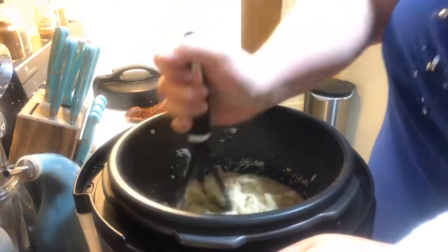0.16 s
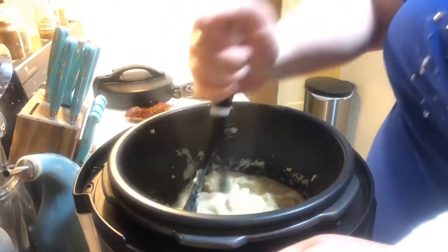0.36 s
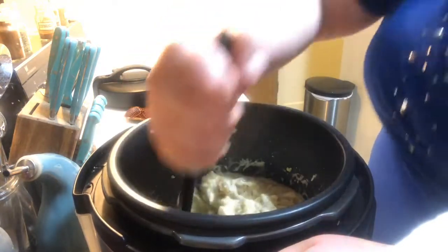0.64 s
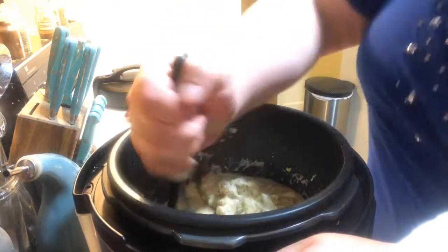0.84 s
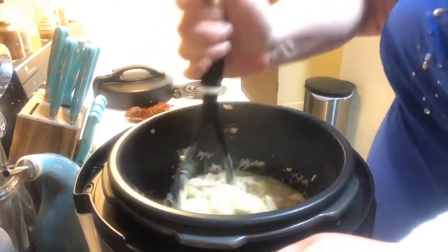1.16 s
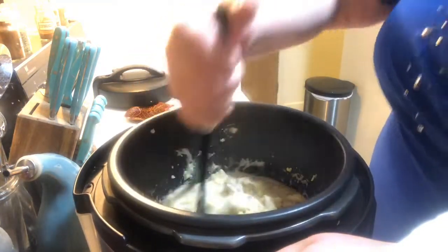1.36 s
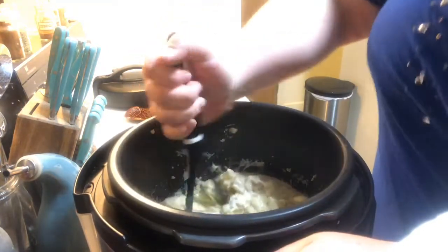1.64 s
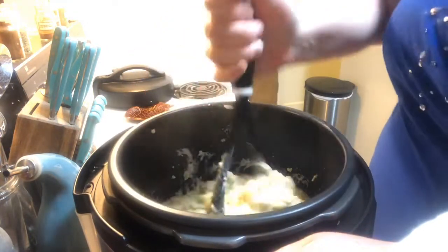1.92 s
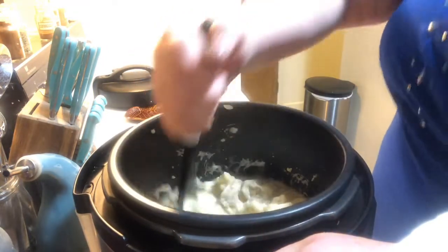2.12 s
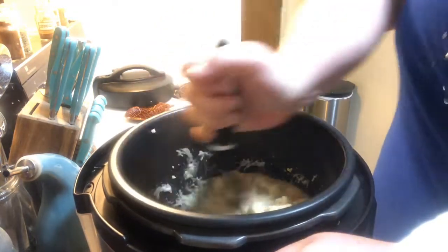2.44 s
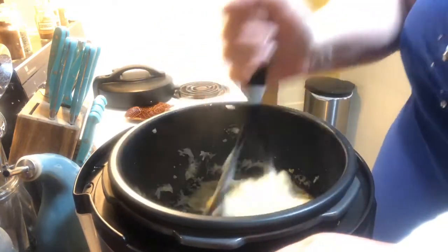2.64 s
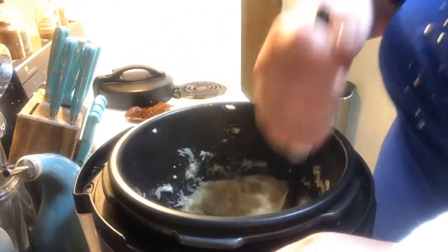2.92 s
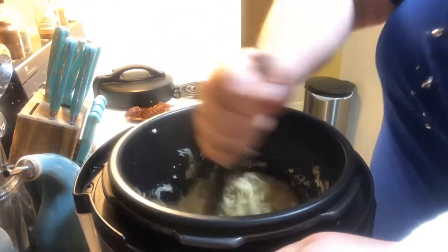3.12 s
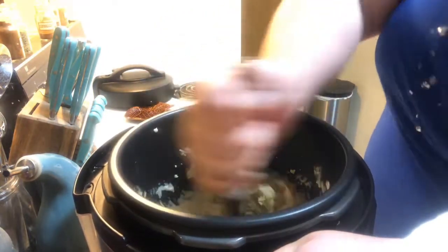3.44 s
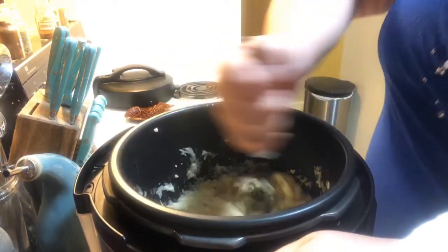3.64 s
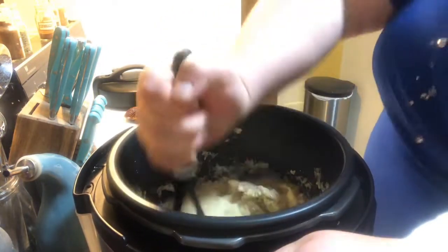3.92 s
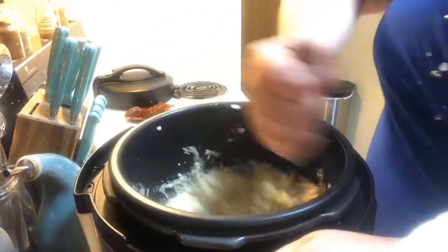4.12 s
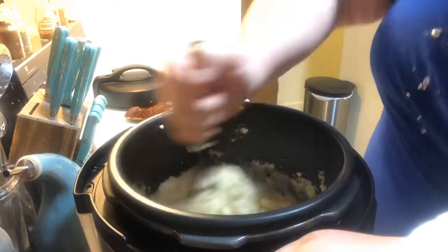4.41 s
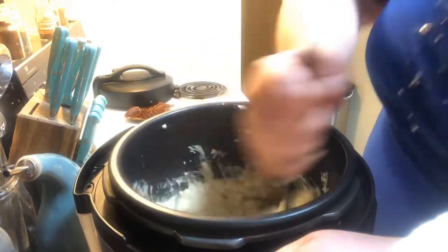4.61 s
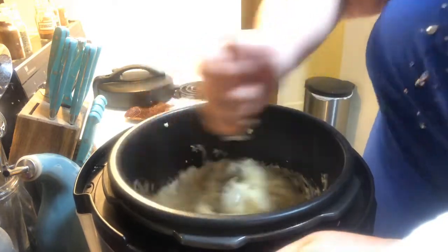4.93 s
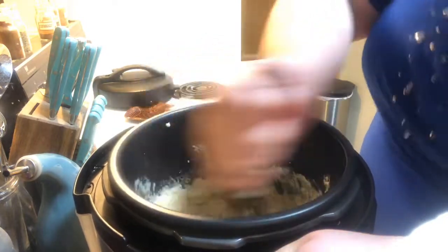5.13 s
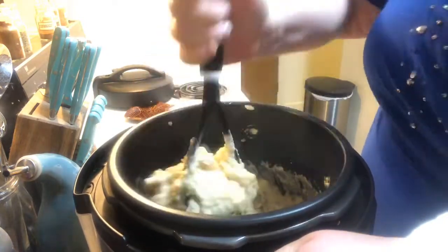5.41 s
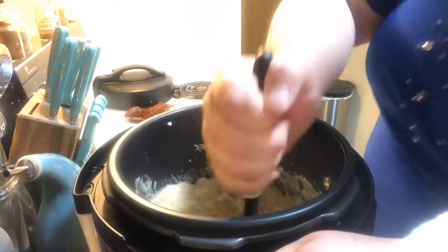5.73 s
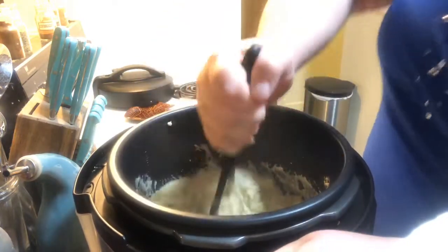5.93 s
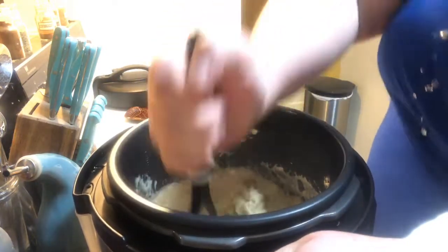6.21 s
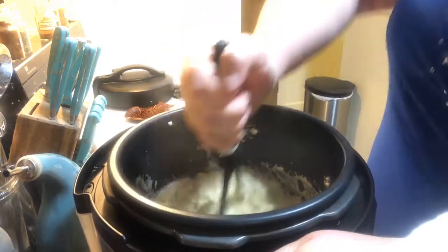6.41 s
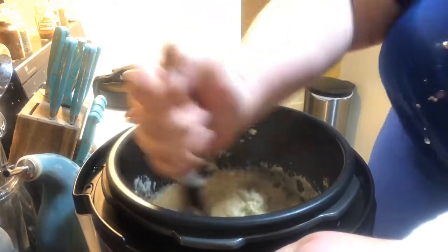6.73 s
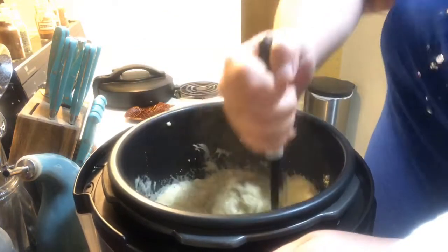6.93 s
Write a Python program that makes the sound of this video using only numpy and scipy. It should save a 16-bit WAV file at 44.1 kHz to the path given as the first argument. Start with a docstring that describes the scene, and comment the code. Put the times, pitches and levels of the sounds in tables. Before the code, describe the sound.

Close up, a masher works wet, sticky cooked potatoes inside a deep pot in a small, quiet kitchen with a faint low hum. Fine crackling starts at once; a clear knock and wet press land near 0.2 s, followed by peeling crackles and snaps around 0.5 s. At 1.0 s a squelch bursts with a short glug and a fine spray. More snaps follow near 1.4 s, then the hardest knock rings the pot sharply at 1.7 s, with a bright snap just after. From 2 to 3 s, sticky pops and snaps scatter between presses. Stirring grows briskest near 3.7 s and stays dense to about 4.9 s, full of slaps, falling glugs and light hollow knocks. After a brief lull, a strong knock hits at 5.2 s. Sparser squelches, snaps and glugs continue through 5.8, 6.1 and 6.5 s, ending with a wet pop near 6.9 s.

```python
"""A masher works wet cooked potatoes in a deep non-stick pot, close up in a small kitchen with a quiet hum.
From the start the mash crackles as it tears (random ticks and pops); films snap and knocks ring the pot (pings).
From 0.2 s the masher presses, and at times peels stickily away; air spits and glugs (sines falling in pitch).
Fine sprays (shaped ticks) hiss from 0.5 s; the hardest knock falls at 1.7 s, the briskest stirring near 3.7 s."""
import sys
import numpy as np
from scipy import signal
from scipy.fft import rfft, irfft
from scipy.io import wavfile
from scipy.ndimage import uniform_filter1d

SR = 44100
rng = np.random.default_rng(int(sys.argv[2]) if len(sys.argv) > 2 else 0)


def digitize_waveform(pressure):
    """Quantize a signal to 16-bit integers and store it at the path in sys.argv[1].

    Rows of a 2-D input are taken as channels; values are limited to [-1, 1].
    """
    field = np.atleast_2d(pressure).T
    bounded = np.clip(field, -1, 1)
    quanta = np.round(bounded * 32767).astype(np.int16)
    wavfile.write(sys.argv[1], SR, quanta)


N = 311346

# spectrum of tearing films of mash: hz, relative_db
CRACKLE_EQ = [(300, -16), (1000, -13), (1900, -5.5), (2700, -5.5), (3500, -1), (4500, 0), (5300, -8),
              (6300, -17.5), (7600, -14), (9500, -34), (15000, -36.5)]
# spectrum of squeezed, slopping mash: hz, relative_db
CHURN_EQ = [(60, -6), (150, -2), (300, -0.5), (480, 1), (640, -4.5), (800, -7.5), (1100, -6), (1500, -7),
            (2100, -9.5), (3500, -8.5), (8000, -60.5)]


def undb(db):
    """Decibels to gain."""
    return 10 ** (np.asarray(db) / 20)


def unit(x):
    """Scale to rms 1."""
    return x / np.sqrt(np.mean(x ** 2) + 1e-18)


def seconds(length_s):
    """Time axis in seconds."""
    return np.arange(int(length_s * SR)) / SR


def add(out, start_s, x):
    """Mix x into out from start_s."""
    i = max(int(start_s * SR), 0)
    out[i:i + len(x)] += x[:max(N - i, 0)]


def colour(x, points, size=2048):
    """Minimum-phase filter of unit energy, shaped by (hz, db) points."""
    hz, db = np.transpose(points)
    grid_hz = np.maximum(np.fft.rfftfreq(size, 1 / SR), 1)
    log_gain = np.log(undb(np.interp(np.log(grid_hz), np.log(hz), db)))
    # fold the cepstrum to make the response causal
    cepstrum = irfft(log_gain)
    cepstrum[1:size // 2] *= 2
    cepstrum[size // 2 + 1:] = 0
    response = irfft(np.exp(rfft(cepstrum)))
    return signal.fftconvolve(x, response / np.linalg.norm(response))[:len(x)]


def ticks(count, rate_hz, spread_db):
    """Tiny ruptures at random moments; a wider spread makes many faint and a few strong; rms 1."""
    size = undb(spread_db * np.minimum(rng.exponential(size=count), 4))
    hits = rng.random(count) < rate_hz / SR
    return unit(hits * size * rng.choice([-1, 1], count))


def pocket(t, first_hz, last_hz, glide_s, decay_s, rise_s):
    """A ringing pocket whose pitch slides from first_hz to last_hz; envelope peak 1."""
    hz = last_hz + (first_hz - last_hz) * np.exp(-t / glide_s)
    swell = (1 - np.exp(-t / rise_s)) ** 2 * np.exp(-t / decay_s)
    return swell / swell.max() * np.sin(2 * np.pi * np.cumsum(hz) / SR)


def room_hum():
    """Soft room noise, with a faint narrow-band drone near the lowest air mode of the pot."""
    # hum spectrum: hz, relative_db
    hum_eq = [(25, -48.5), (50, 8.5), (90, 4.5), (180, 8.5), (300, -9), (600, -4.5), (1100, -15),
              (2500, -49), (4400, -45), (6500, -21), (10000, -24), (15500, -26)]
    hum_db, drone_hz, drone_db = -64.5, 188, -66.5
    drone_eq = [(60, -35), (130, -16), (drone_hz, 0), (240, -18), (600, -50)]
    drone = colour(rng.standard_normal(N), drone_eq, size=8192)
    hum = colour(rng.standard_normal(N), hum_eq, size=8192)
    return undb(hum_db) * hum + undb(drone_db) * drone


def strokes(rows, attack_s, release_s):
    """Gain of a series of strokes: each swells, holds for its length and dies away; powers add."""
    t = np.arange(N) / SR
    power = np.zeros(N)
    for start_s, length_s, level_db in rows:
        before = (start_s - t) / attack_s
        after = (t - start_s - length_s) / release_s
        power += undb(2 * level_db) * np.exp(-2 * np.clip(np.maximum(before, after), 0, 20))
    return np.sqrt(power)


def effort():
    """Gains of crackle and churn: peeling crackles, pressing mostly churns, stirring does both."""
    # masher presses down and squeezes the mash: start_s, length_s, level_db
    press_rows = [(.2, 0.057, -46.5), (.67, .06, -63), (.98, 0.057, -49), (1.43, 0.029, -51),
                  (1.76, 0.017, -38), (2.05, 0.054, -57.5), (2.155, 0.019, -44), (2.485, 0.033, -56),
                  (2.805, 0.052, -48), (3.27, 0.057, -49.5), (3.46, 0.087, -54), (3.63, .06, -50.5),
                  (3.73, 0.055, -42), (3.85, 0.07, -42.5), (4.13, 0.035, -41), (4.23, .11, -42),
                  (4.44, 0.11, -50), (4.58, 0.068, -43.5), (4.7, 0.12, -47), (4.87, 0.052, -48),
                  (5.22, 0.1, -49), (5.44, 0.1, -57.5), (5.57, 0.047, -48.5), (5.81, 0.044, -49.5),
                  (6.12, 0.044, -48), (6.32, 0.0067, -46.5), (6.53, .08, -46.5), (6.65, 0.022, -45),
                  (6.875, 0.013, -44.5)]
    # masher lifts and the sticky mash peels off: start_s, length_s, level_db
    peel_rows = [(.23, 0.073, -50.5), (.47, .1, -54), (.64, 0.093, -57), (1.06, 0.046, -53),
                 (1.32, 0.13, -55), (1.9, 0.037, -54.5), (2.07, 0.14, -57), (2.49, 0.12, -55),
                 (2.69, .06, -53.5), (2.88, 0.11, -50), (3.12, 0.067, -50.5), (3.36, 0.061, -52),
                 (3.99, 0.042, -66), (4.37, .12, -51), (4.93, 0.067, -57.5), (5.42, .08, -53.5),
                 (5.87, 0.046, -57.5), (6.36, 0.094, -53), (6.58, 0.055, -49.5), (6.84, 0.16, -57.5)]
    # briskness of movement between strokes: time_s, level_db
    stir_points = [(0, -63.5), (.13, -70), (.6, -62), (1.6, -63), (2.4, -62.5), (3.1, -57.5), (3.7, -50.5),
                   (4.85, -56.5), (5.08, -69), (5.35, -62), (6.0, -62), (6.5, -60.5), (7.06, -61.5)]
    press_crackle_db, stir_crackle_db = -9, -2  # relative to the gain of each one's churn
    stir = undb(np.interp(np.arange(N) / SR, *np.transpose(stir_points)))
    press = strokes(press_rows, attack_s=.012, release_s=0.022)
    peel = strokes(peel_rows, attack_s=0.0071, release_s=0.019)
    crackle_parts = [peel, undb(press_crackle_db) * press, undb(stir_crackle_db) * stir]
    return np.linalg.norm(crackle_parts, axis=0), np.hypot(press, stir)


def pops(count, lo_hz, hi_hz, cycles, spread_db):
    """A stream of tiny wet pops, each a few cycles at its own rising pitch: many faint, a few strong; rms 1."""
    out, t = np.zeros(N), seconds(.006)
    pitches_hz = lo_hz * (hi_hz / lo_hz) ** np.linspace(0, 1, 20)
    shapes = []
    for hz in pitches_hz:
        shape = pocket(t, hz, hz * 1.272, glide_s=cycles / hz, decay_s=cycles / hz, rise_s=.5 / hz)
        shapes.append(np.sqrt(hz) * shape)
    for when, which, strength in rng.random((count, 3)):
        gain = undb(-spread_db * np.log(max(strength, 1 / 30)))
        add(out, when * N / SR, shapes[int(which * len(shapes))] * gain)
    return unit(out)


def tearing(crackle_gain, churn_gain):
    """Sticky mash pulls apart in a fine fizz and little pops, with duller slaps where it is squeezed."""
    fizz = undb(-8.0) * ticks(N, rate_hz=9000, spread_db=9.0)
    crackle = undb(-7.5) * pops(count=2600, lo_hz=2900, hi_hz=12000, cycles=2.6, spread_db=7.0)
    slaps = undb(-14.5) * pops(count=1200, lo_hz=679, hi_hz=2500, cycles=1.58, spread_db=5.0)
    churn = undb(-9) * ticks(N, rate_hz=2300, spread_db=2.0)
    torn = colour(crackle_gain * (fizz + crackle), CRACKLE_EQ)
    squeezed = colour(churn_gain * (slaps + churn), CHURN_EQ)
    return torn + squeezed


def rustle(crackle_gain, churn_gain, smear_db=-9, scrape_db=-14):
    """The masher drags through the soft paste: a dense, smooth rustle under the crackle."""
    # rustle spectrum: hz, relative_db
    rustle_eq = [(500, -9.5), (1100, -9.5), (1900, -3.5), (3200, -4.5), (4500, 3), (5600, -5),
                 (7600, -11.5), (10000, -26), (15000, -31)]
    drag_gain = np.hypot(crackle_gain, undb(scrape_db) * churn_gain)
    smear = colour(drag_gain * ticks(N, rate_hz=22000, spread_db=0.0), rustle_eq)
    return undb(smear_db) * smear


def stray_snaps(crackle_gain, count):
    """Fainter snaps at random moments, following the tearing around them up to a ceiling."""
    above_tearing_db, spread_db, ceiling_db = 13, 0.5, -54  # the ceiling limits the tearing level
    centre_hz, spread_octaves, splutter_db = 4540, 0.22, -7
    rows = []
    for when, strength, pitch in rng.random((count, 3)):
        tearing_db = min(20 * np.log10(crackle_gain[int(when * N)]), ceiling_db)
        level_db = tearing_db + above_tearing_db + spread_db * (2 * strength - 1)
        pitch_hz = centre_hz * 2 ** (spread_octaves * (2 * pitch - 1))
        rows.append((when * N / SR, level_db, pitch_hz, splutter_db))
    return rows


def pings(rows, ring_s):
    """A bright falling ping of a few cycles, a hollow body that outlasts it, and a splutter of torn film."""
    notes, splutter, t = np.zeros(N), np.zeros(N), seconds(.04)
    burst = (1 - np.exp(-t / 0.0017)) * np.exp(-t / 0.0029)
    body = pocket(t, 2030, 920, glide_s=0.00093, decay_s=0.0025, rise_s=0.00004)
    for start_s, level_db, hz, body_db, splutter_db in rows:
        ping = pocket(t, hz * 1.072, hz * 0.962, glide_s=0.00069, decay_s=ring_s, rise_s=0.00011)
        overtone = pocket(t, hz * 2.0, hz * 1.71, glide_s=0.00064, decay_s=0.00034, rise_s=0.00026)
        note = ping + undb(-23.5) * overtone + undb(body_db - 14.0) * body
        add(notes, start_s, undb(level_db - 1.0) * note)
        torn = burst * ticks(len(t), rate_hz=15000, spread_db=2.5)
        add(splutter, start_s, undb(level_db + splutter_db + 5.5) * torn)
    return notes + colour(splutter, CRACKLE_EQ)


def knocks_and_snaps(crackle_gain, snap_body_db=-19):
    """Knocks share one pitch and mostly sound hollow; snaps have their own pitch and little body."""
    # bursts of thin films of mash: start_s, level_db, pitch_hz, splutter_db
    snap_rows = [(.0192, -40, 3000, -15), (.294, -38, 5170, -19), (.3576, -36.5, 4250, -11),
                 (.4993, -35.5, 4020, -11), (.5278, -30, 4840, -13), (.5514, -31.5, 3640, -6.5),
                 (.6714, -37, 1610, -17), (.7177, -28.5, 1870, -14), (.7995, -38, 3270, -8.5),
                 (1.0792, -30, 5050, -11.5), (1.255, -44, 3730, -3.5), (1.3677, -27.5, 4320, -9),
                 (1.392, -33, 4550, -19), (1.4127, -40.5, 4470, 2.5), (1.49, -38, 4700, -2.5),
                 (1.4379, -41, 4700, 4.5), (1.7647, -33, 1980, -12), (1.7816, -21, 4860, -22),
                 (1.9962, -40, 4760, -4), (2.0075, -33.5, 4400, -0.5), (2.155, -27.5, 4540, -7),
                 (2.1984, -24.5, 4100, -15), (2.2467, -37.5, 2900, -4), (2.3283, -50.5, 4240, 3.5),
                 (2.4863, -33, 4530, -10), (2.5395, -27.5, 4930, -35), (2.7382, -36.5, 3800, -7),
                 (2.8911, -35, 3100, 0), (2.9433, -35, 3900, -5), (2.9709, -28, 3270, -14),
                 (3.0116, -29.5, 4680, -13), (3.1093, -27, 4570, -13.5), (3.2708, -36.5, 3540, 1),
                 (3.7321, -24.5, 4780, -5.5), (4.0127, -30, 1900, -10), (4.0666, -30.5, 1880, -8),
                 (4.4642, -29, 1980, -5.5), (5.002, -35.5, 4550, -18), (5.156, -38, 4030, -14.5),
                 (5.663, -37, 4700, -10), (5.682, -33, 4330, -13), (5.8266, -21.5, 2140, -17),
                 (5.8606, -38, 4340, 1.5), (6.0617, -42.5, 3040, -1), (6.1168, -25, 1700, -5),
                 (6.341, -31.5, 3440, -8), (6.3911, -31, 4260, -14), (6.5759, -23, 4170, 0),
                 (6.6606, -27, 1650, -6), (6.8845, -25.5, 4430, -12)]
    # masher knocks on the pot through the mash: start_s, level_db, body_db, splutter_db
    knock_rows = [(0.1862, -14.5, 4, -14.5), (0.898, -40, 4, -1.5), (0.9882, -21.5, -16, -5.5),
                  (1.696, -3.5, -0.5, -17.5), (2.81, -38, 14, 3), (3.3447, -27.5, 11.5, -4.5),
                  (3.7417, -27.5, -10, -7), (3.8779, -24, 3.5, -29), (4.2324, -30, 12.5, -22),
                  (4.3006, -24, 2.5, -13), (4.346, -28.5, 3, -15), (4.7637, -29, 12.5, -6),
                  (5.1989, -8.5, 1, -14), (5.2511, -28.5, 13, -6.5), (5.5693, -22, 5, -6.5),
                  (6.531, -21, 10, 2.5)]
    knock_hz = 3970
    knocks = [(start_s, level_db, knock_hz, body_db, splutter_db)
              for start_s, level_db, body_db, splutter_db in knock_rows]
    films = [(start_s, level_db, hz, snap_body_db, splutter_db)
             for start_s, level_db, hz, splutter_db in list(snap_rows) + stray_snaps(crackle_gain, count=60)]
    return pings(knocks, ring_s=0.00057) + pings(films, ring_s=0.001)


def glugs():
    """Air spits through a narrowing film of mash; the pocket opens, its note drops and the mash slops back."""
    # air pockets opening: start_s, level_db, first_hz, decay_s, spit_db
    glug_rows = [(0.201, -34.5, 344, 0.006, -56), (0.377, -42.5, 274, 0.017, -53.5),
                 (0.403, -40.5, 132, .018, -81), (0.673, -36, 840, 0.0025, -49),
                 (.994, -30.5, 952, 0.019, -52), (1.0025, -15, 1080, 0.00093, -47),
                 (1.004, -27.5, 580, .005, -54), (1.132, -44, 248, 0.0081, -54),
                 (1.158, -45.5, 117.6, 0.035, -66), (1.705, -33, 270, 0.0089, -68),
                 (1.768, -31, 1085, 0.009, -64), (1.781, -28.5, 687, 0.012, -37),
                 (1.877, -37.5, 1123, .006, -52.5), (2.161, -38.5, 563, 0.019, -47),
                 (2.198, -28.5, 1010, 0.0035, -41), (2.246, -34, 970, 0.0027, -70),
                 (2.758, -36, 750, 0.0032, -61), (2.818, -33.5, 490, 0.0078, -45),
                 (3.31, -38, 753, 0.027, -66), (3.344, -31, 728, 0.012, -78), (3.37, -46, 160, 0.018, -68),
                 (3.513, -35.5, 512, 0.02, -44), (3.628, -39, 401, 0.02, -39.5),
                 (3.743, -43, 604, 0.034, -38), (3.766, -36, 688, 0.011, -50),
                 (3.914, -34.5, 417, 0.02, -46.5), (4.027, -38.5, 302, 0.014, -40),
                 (4.145, -27.5, 678, 0.011, -47), (4.166, -38, 500, 0.013, -47),
                 (4.235, -47, 757, 0.015, -52), (4.309, -33, 250, 0.004, -55),
                 (4.326, -35, 967, 0.011, -62), (4.484, -38, 292, .012, -42),
                 (4.604, -34.5, 607, 0.0099, -46), (4.633, -46, 573, 0.014, -46.5),
                 (4.71, -43, 446, 0.018, -48), (4.792, -41, 701, 0.017, -46),
                 (4.812, -30.5, 350, 0.0066, -63), (4.889, -34.5, 276, 0.0084, -38.5),
                 (5.201, -24, 429, 0.0115, -45), (5.4, -45, 240, .017, -76),
                 (5.571, -40.5, 513, 0.024, -44), (6.071, -39, 280, 0.009, -52),
                 (6.175, -35, 350, 0.017, -50), (6.535, -28, 352, 0.019, -41),
                 (6.665, -25.5, 222, .011, -66), (6.898, -22.5, 378, 0.002, -46)]
    fall_share, open_s = .5, .01  # share of pitch lost when fully open; time scale of opening
    flutter_depth = .5
    lead_s, early_s, spit_s = .04, .008, .010
    notes, swell, collapse, t = np.zeros(N), np.zeros(N), np.zeros(N), seconds(.15)
    for start_s, level_db, first_hz, decay_s, spit_db in glug_rows:
        # longer glugs open wider and fall further
        openness = 1 - np.exp(-(decay_s / open_s) ** 2)
        last_hz = first_hz * (1 - fall_share * openness)
        note = pocket(t, first_hz, last_hz, glide_s=0.788 * decay_s, decay_s=decay_s, rise_s=0.00033)
        # the soft walls flap
        flutter = unit(uniform_filter1d(rng.standard_normal(len(t)), size=90))
        add(notes, start_s, undb(level_db - 7.5) * note * (1 + flutter_depth * flutter))
        slop_shape = (1 - np.exp(-t / 0.0002)) * np.exp(-t / (0.72 * decay_s))
        add(collapse, start_s, undb(level_db - 15.5) * slop_shape)
        # the spit peaks early_s before the pocket opens
        spit_shape = np.exp(-np.abs(t - lead_s) / spit_s)
        add(swell, start_s - lead_s - early_s, undb(spit_db) * spit_shape)
    spit = colour(swell * ticks(N, rate_hz=5000, spread_db=0), CRACKLE_EQ)
    slop = colour(collapse * ticks(N, rate_hz=5000, spread_db=2.0), CHURN_EQ)
    return notes + undb(-1) * spit + slop


def sprays(decay_s=0.0077):
    """Droplets flung from wet bursts: a brief, high hiss."""
    # fine sprays of droplets: start_s, level_db
    spray_rows = [(.528, -47), (0.985, -40), (1.439, -54), (1.995, -48.5), (2.328, -52), (2.968, -50),
                  (3.529, -43), (3.731, -43), (6.893, -47)]
    # spray spectrum: hz, relative_db
    spray_eq = [(2000, -32), (5000, 11), (7600, 2), (10000, -3), (15000, -15)]
    t, swell = seconds(.05), np.zeros(N)
    for start_s, level_db in spray_rows:
        add(swell, start_s, undb(level_db) * np.exp(-t / decay_s))
    return colour(swell * ticks(N, rate_hz=19000, spread_db=17.0), spray_eq)


def pot_and_kitchen(x):
    """The pot rings in its modes, its wall throws quick echoes, and the kitchen adds a short tail."""
    # air in the pot and its wall: mode_hz, resonance_over_direct_db, t60_s
    pot_modes = [(181, 10.5, 0.049), (285.4, 8, 0.086), (453, 5, 0.085), (591, 4, 0.018), (1019, 0, 0.049),
                 (1125, 2, 0.07), (1270, -30.5, 0.22), (1920, -6, 0.027)]
    # spectrum of the reflections: hz, relative_db
    reflection_eq = [(100, -19.5), (400, 5.5), (1100, 0), (2500, -1), (4200, -3.5), (8000, 0), (15000, 1.5)]
    t = seconds(.6)
    response = np.zeros(len(t))
    response[0] = 1  # direct sound
    for hz, level_db, t60_s in pot_modes:
        damping = np.log(1000) / t60_s
        ring = np.exp(-damping * t) * np.cos(2 * np.pi * hz * t)
        response += undb(level_db) * 2 * damping / SR * ring
    # pot wall, then kitchen
    for delay_s, t60_s, level_db in [(.0015, .04, -9), (.005, .36, -12)]:
        noise = colour(rng.standard_normal(len(t)), reflection_eq)
        echoes = noise * (t > delay_s) * np.exp(-np.log(1000) * t / t60_s)
        response += undb(level_db) * echoes / np.linalg.norm(echoes)
    return signal.fftconvolve(x, response)[:N]


def scene():
    """All the mash sounds come from inside the pot; the hum is added outside it."""
    crackle_gain, churn_gain = effort()
    mash = knocks_and_snaps(crackle_gain) + sprays() + glugs()
    mash += tearing(crackle_gain, churn_gain) + rustle(crackle_gain, churn_gain)
    return (pot_and_kitchen(mash) + room_hum())[None]


def record(dry):
    """The recorder thins the deepest bass and cuts the top."""
    top_hz = 15850
    thin = signal.sosfilt(signal.butter(2, 40, "high", fs=SR, output="sos"), dry)
    return signal.sosfilt(signal.ellip(10, .2, 70, top_hz, fs=SR, output="sos"), thin)


dry = scene()
out = record(dry)
digitize_waveform(out)
```